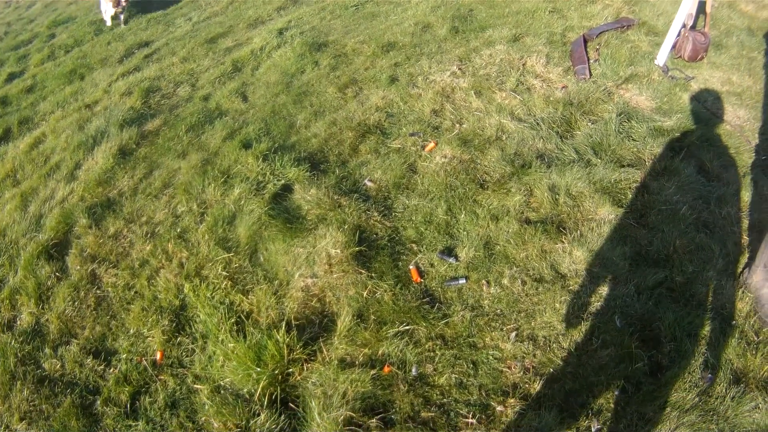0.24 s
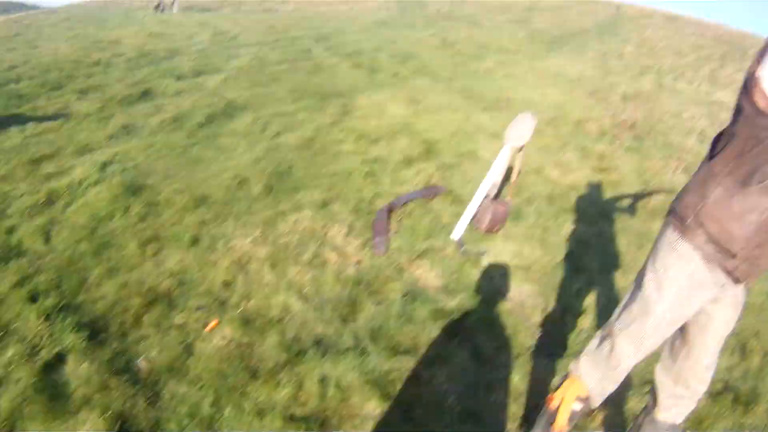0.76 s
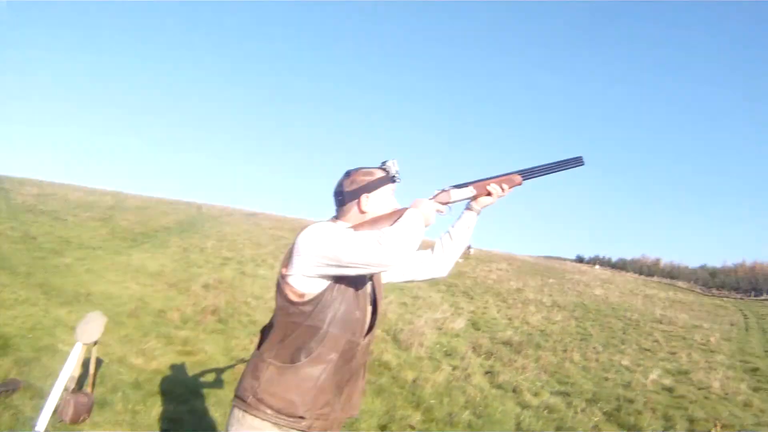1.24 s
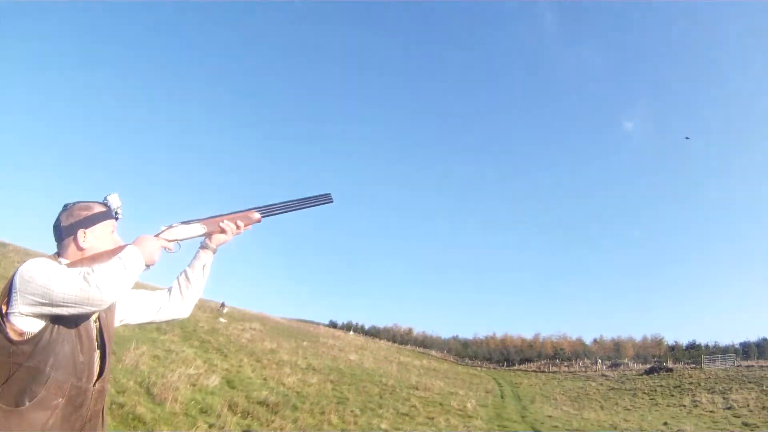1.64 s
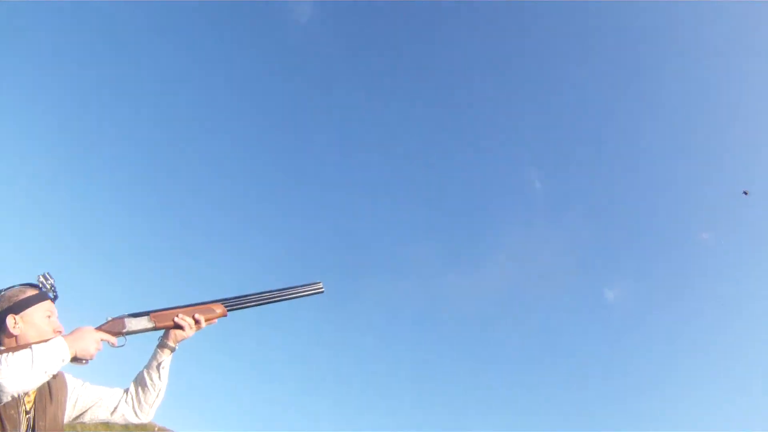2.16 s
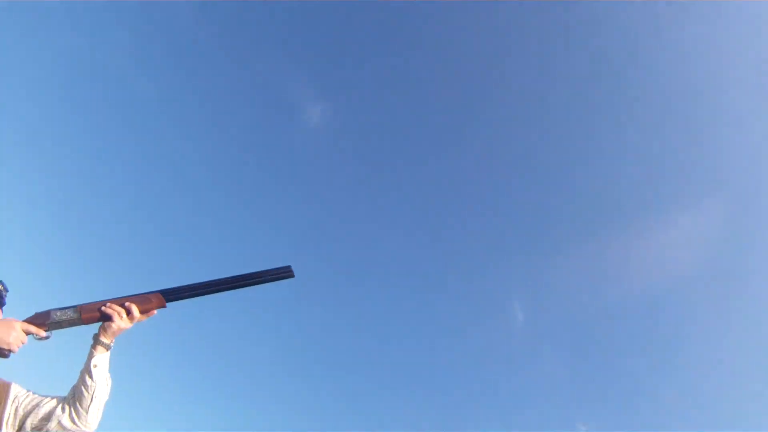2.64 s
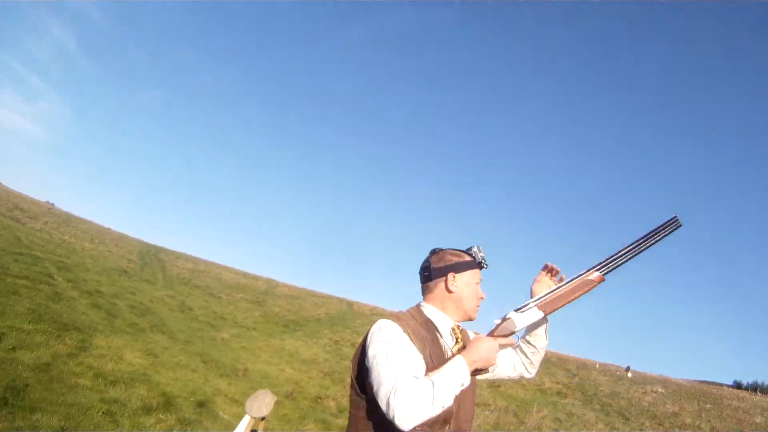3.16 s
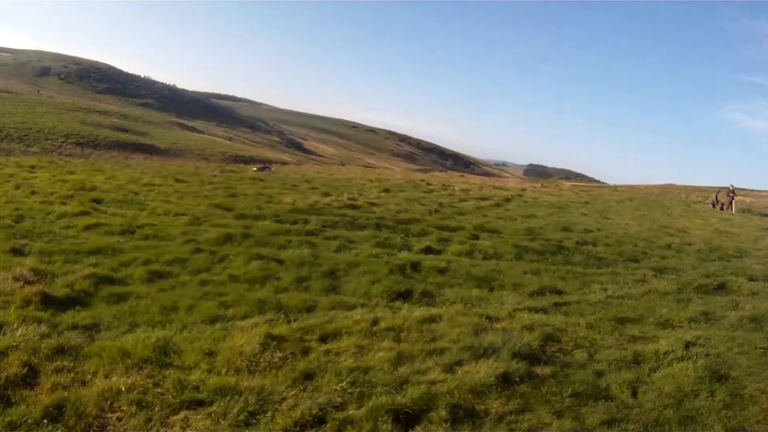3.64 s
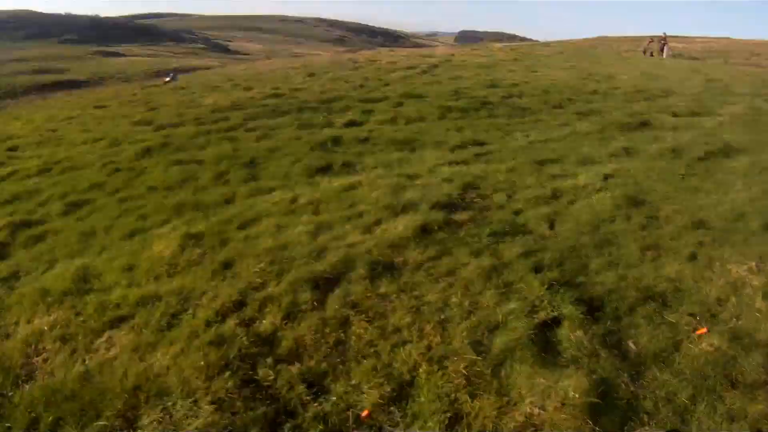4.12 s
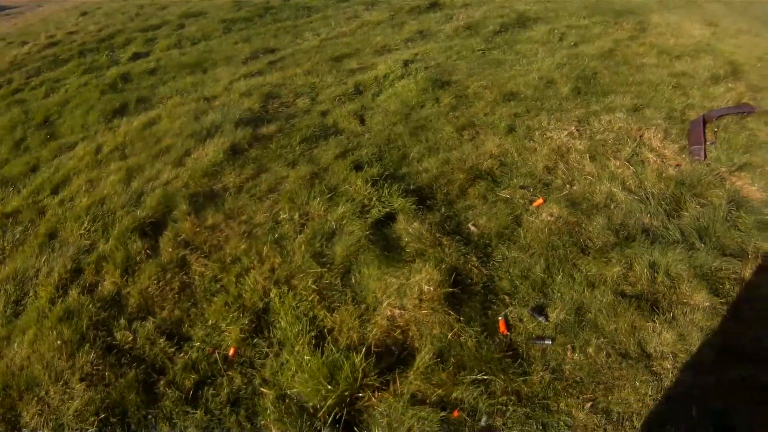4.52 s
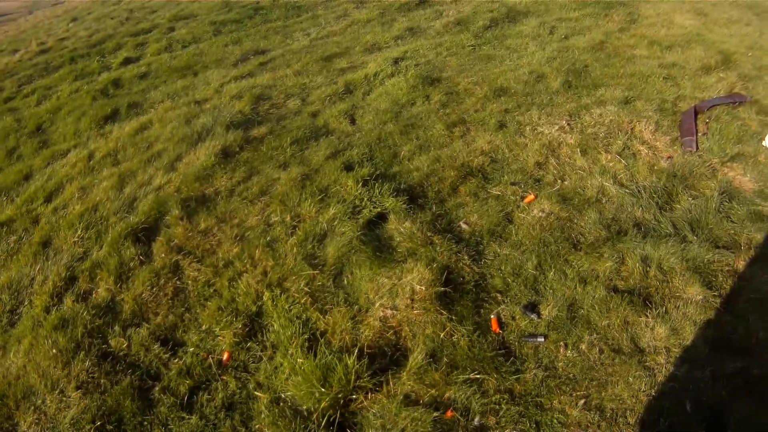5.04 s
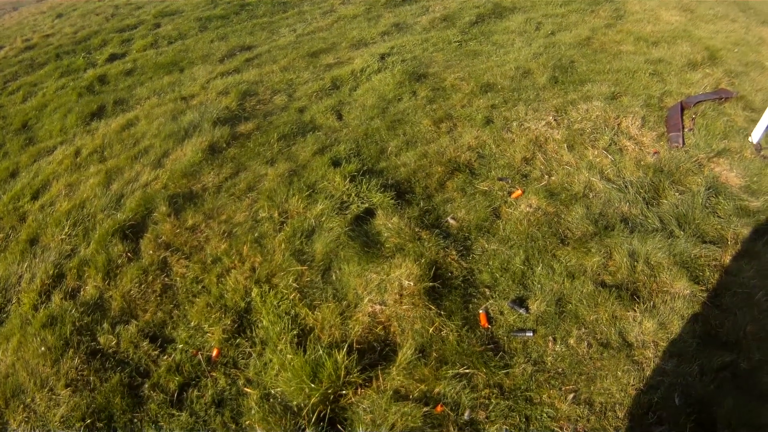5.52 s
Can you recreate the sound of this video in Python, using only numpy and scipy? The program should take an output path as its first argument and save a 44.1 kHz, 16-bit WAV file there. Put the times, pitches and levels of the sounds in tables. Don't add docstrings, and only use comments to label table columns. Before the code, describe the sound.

Low-fidelity outdoor sound, boxy and gritty, with a faint hush and wind buffets. After brief handling noise, shotguns fire four times within about a second, overloading the microphone and ringing its case. Rattling echoes scatter and fade by the third second. Later come a gun part's metallic click, very faint birds, a soft rustle and a final tick.

```python
import sys
import numpy as np
from scipy import signal
from scipy.fft import rfft, irfft
from scipy.io import wavfile
from scipy.ndimage import uniform_filter1d

SR = 44100
rng = np.random.default_rng(int(sys.argv[2]) if len(sys.argv) > 2 else 0)


def voltage_ratio(level):
    return 10 ** (np.asarray(level, float) / 20)


def generate_wav(signal):
    frames = np.transpose(np.atleast_2d(signal))
    scaled = np.clip(frames, -1, 1) * 32767
    pcm = np.round(scaled).astype(np.int16)
    wavfile.write(sys.argv[1], SR, pcm)


N = 254811
T = np.arange(N) / SR
COARSE_T = T[::32]
SIDES = np.array([[1], [-1]])

# t/s, peak/dB, time to gain drop/ms, gain drop/dB, forerunner lead/ms
SHOTS = [
    (0.9734, 4.5, 6.2, -8.5, 0.62),
    (1.7149, 3.5, 5.7, -4.5, 1.41),
    (1.92, 12, 4.7, -13.5, 0.71),
    (1.9452, 14.5, 5.7, -9, 0.36),
]
# f/Hz, density/dB
CASE_COLOUR = [(180, -43), (300, -12.5), (395, -22.5), (603, -10), (855, -16.5), (1170, -7.5), (1550, -6),
               (2050, -6.5), (2560, -12), (2790, -11), (2970, -15.5), (3720, -15), (4160, -26.5),
               (5270, -18), (5900, -41.5), (7670, -67.5), (13000, -120)]


def level(x, rms_db):
    return x * voltage_ratio(rms_db) / np.sqrt(np.mean(x ** 2))


def colour(x, shape):
    hz, db = np.transpose(shape)
    f_hz = np.fft.rfftfreq(len(x), 1 / SR) + 1
    gain_db = np.interp(np.log(f_hz), np.log(hz), db)
    return irfft(rfft(x) * voltage_ratio(gain_db), len(x))


def sos_filter(x, order, edges_hz):
    return signal.sosfilt(signal.butter(order, edges_hz, "bandpass", fs=SR, output="sos"), x)


def walk(rate_hz):
    k = int(SR / rate_hz)
    steps = np.repeat(rng.standard_normal(N // k + 1), k)
    return 1.4 * uniform_filter1d(steps, k)[:N]


def ring(t, hz, db, t60_s, phase=0):
    return (t >= 0) * voltage_ratio(db - 60 * np.abs(t) / t60_s) * np.sin(2 * np.pi * hz * t + phase)


def swell(bursts, rise_db_per_s):
    power = 0
    for start_s, hold_s, db, t60_s in bursts:
        rise_db = rise_db_per_s * np.clip(start_s - COARSE_T, 0, None)
        fall_db = 60 * np.clip(COARSE_T - start_s - hold_s, 0, None) / t60_s
        power = power + voltage_ratio(db - rise_db - fall_db) ** 2
    return np.interp(T, COARSE_T, np.sqrt(power))


def add(out, start_s, x):
    i = int(start_s * SR)
    out[..., i:i + x.shape[-1]] += x[..., :N - i]


def air():
    # f/Hz, density/dB
    hush_colour = [(12, -35), (20, -3), (135, -3), (295, -8), (317, -8.5), (499, -11.5), (2350, -18.5),
                   (2710, -19.5), (3520, -21), (4470, -21.5), (5950, -26.5), (7740, -64), (13100, -120)]
    # f/Hz, density/dB
    hiss_colour = [(12, -35.5), (20, -20), (64, -20), (130, -10), (300, -3), (1940, -3.5), (5410, -3),
                   (5950, -15), (7740, -45.5), (13100, -120)]
    hush = level(colour(rng.standard_normal(N), hush_colour), -62) * voltage_ratio(0.41 * walk(2.0))
    hiss = level(colour(rng.standard_normal(N), hiss_colour), -78)
    return hush + hiss * SIDES


def wind():
    # centre t/s, peak/dB, fall to either side/(dB/s)
    gusts = [(.09, -59, 300), (.29, -58, 200), (.62, -49.5, 90), (.8, -60, 102), (1.0, -54, 53),
             (1.2, -48.5, 124.5), (1.332, -49, 149), (1.54, -55, 204), (1.68, -55, 75), (1.8, -53.5, 300),
             (1.88, -56.5, 299), (2.18, -49, 116), (2.35, -54, 38), (2.63, -58.5, 100),
             (2.78, -45.5, 299.5), (2.86, -54, 118), (3.03, -53.5, 220), (3.15, -54.5, 220),
             (3.3, -51, 180), (3.41, -50.5, 220), (3.55, -53.5, 200), (3.64, -54.5, 150), (3.78, -60, 60),
             (4.09, -50.5, 108.5), (4.29, -68, 100), (4.57, -66, 150), (4.73, -63, 200), (4.97, -70, 80),
             (5.2, -65, 30), (5.68, -74, 80)]
    low = colour(rng.standard_normal(N), [(12, -9.5), (30, 1.0), (50, 0.0), (90, -17.0), (250, -35.5), (1000, -72)])
    low /= np.sqrt(uniform_filter1d(low ** 2, SR // 12) + 1e-12)
    power = sum(voltage_ratio(db - fall * np.abs(COARSE_T - s)) ** 2 for s, db, fall in gusts)
    return low * np.interp(T, COARSE_T, np.sqrt(power))


def streaks():
    # t/s, length/s, f/Hz, level/dB
    bands = [(0.572, .06, 3680, -62), (0.672, 0.057, 3650, -63), (.54, 0.23, 1110, -63),
             (0.582, 0.081, 2050, -53.5), (.59, .2, 1440, -63), (1.02, 0.22, 2370, -60),
             (1.251, 0.16, 2780, -65), (1.09, 0.24, 1150, -64), (1.104, .2, 3650, -75),
             (1.223, .08, 1750, -66), (1.744, 0.062, 2350, -64), (1.815, 0.029, 2440, -51),
             (1.857, 0.014, 2350, -53), (1.959, 0.033, 2380, -46.5), (1.98, .06, 3150, -60.5),
             (1.979, 0.072, 1180, -67), (2.06, 0.087, 2750, -64), (2.083, .05, 2350, -59),
             (2.17, 0.097, 2040, -57), (2.169, 0.17, 1200, -61), (2.182, 0.054, 2800, -59),
             (2.197, .1, 3700, -64), (2.287, .09, 2010, -62), (2.333, 0.065, 2300, -58),
             (2.418, 0.11, 1720, -63.5), (2.42, 0.064, 1220, -63), (2.458, 0.097, 2020, -63),
             (2.569, 0.18, 1800, -72), (2.575, .055, 1313, -61.5), (2.58, .05, 2320, -65),
             (5.65, 0.04, 1313, -67), (5.725, 0.04, 3250, -66), (5.652, .035, 2330, -63),
             (5.685, .02, 2370, -59), (5.68, .025, 1700, -62), (5.74, .04, 2000, -63),
             (5.63, .025, 3400, -67), (2.62, .08, 1700, -69), (2.79, .08, 1900, -69), (2.86, .1, 1680, -69),
             (1.56, .12, 1800, -67), (.505, .02, 2000, -69)]
    width_hz, edge_s = 150, 0.024
    out, t = np.zeros(N), np.arange(SR // 3) / SR
    for s, length_s, hz, db in bands:
        band = rng.standard_normal(len(t))
        for q in (hz / width_hz, hz / width_hz / 2):
            band = signal.lfilter(*signal.iirpeak(hz, q, SR), band)
        gate = np.clip(.5 + np.minimum(t - edge_s / 2, length_s - t) / edge_s, 0, 1)
        add(out, s, level(band, db) * gate)
    return out


def case_wash(treble_db, rumble_db, grain_db):
    # f/Hz, width/Hz, level over broad colour/dB
    case_peaks = [(1130, 40, 8), (1730, 170, 5.5), (2040, 260, 3), (2360, 160, 6), (2780, 85, 0.5),
                  (3110, 310, 1), (3620, 410, 3)]
    grain = voltage_ratio(grain_db * walk(160))
    wash = colour(rng.standard_normal(N), CASE_COLOUR)
    for hz, width_hz, db in case_peaks:
        peak = signal.lfilter(*signal.iirpeak(hz, hz / width_hz, SR), wash)
        wash = wash + voltage_ratio(db + 2.5 * walk(14)) * peak
    wash = level(wash, 0)
    dull = signal.sosfiltfilt(signal.butter(3, 3700, fs=SR, output="sos"), wash)
    rumble_colour = [(60, -20.5), (110, -3.0), (200, -3.5), (450, -12.5), (900, -31.0)]
    rumble = level(colour(rng.standard_normal(N), rumble_colour), 0)
    return grain * (dull + voltage_ratio(treble_db) * (wash - dull)) + voltage_ratio(rumble_db) * rumble


def rustle():
    # t/s, hold/s, level/dB, t60/s
    strokes = [(.61, 0.061, -53.5, 0.86), (.7, 0.035, -52.5, 0.34), (1.52, 0.019, -76.5, 0.43),
               (1.6, 0.064, -64, 0.44), (2.95, .02, -65.5, 0.31), (3.03, 0.13, -69.5, 0.43),
               (3.27, 0.066, -60.5, .6), (3.7, 0.033, -60.5, 0.42), (3.9, .02, -68, .3),
               (4.0, 0.041, -66, 0.55), (5.66, 0.038, -62, 0.26), (5.735, .04, -66.5, .5)]
    return swell(strokes, 250) * case_wash(treble_db=0.5, rumble_db=-12, grain_db=1.5)


def strike_case(hits):
    # f/Hz, level/dB, t60/s
    slap_modes = [(900, -11.5, .01), (1143, -6.5, .014), (1360, -2, 0.014), (1680, -3.5, .012),
                  (2040, -4, .012), (2380, -3, .018), (2780, -11.5, 0.013), (3200, -10, .012),
                  (3650, -8.5, 0.013)]
    slap_db, slap_scatter_db, puff_db, t60_s = -3.5, 3, -9.5, .016
    out, t = np.zeros(N), np.arange(SR // 12) / SR
    slap = np.array([ring(t, hz, db + slap_db, mode_t60_s, 2.0 * k)
                     for k, (hz, db, mode_t60_s) in enumerate(slap_modes)])
    soft = 1 - np.exp(-t / 0.00038)
    for s, db, hz, bright_db in hits:
        noise = rng.standard_normal(len(t))
        puff = level(colour(noise, CASE_COLOUR), db + puff_db)
        puff += level(sos_filter(noise, 3, (3000, 4150)), db + bright_db - 5.5)
        puff += level(sos_filter(noise, 2, (4400, 5600)), db + bright_db - 12)
        modes = voltage_ratio(db - 5 + slap_scatter_db * noise[:len(slap)]) @ slap
        tone = ring(t, hz, db - 1.5, t60_s)
        add(out, s, soft * (tone + modes + puff * voltage_ratio(-60 * t / (1.3 * t60_s))))
    return out


def knocks():
    # t/s, peak/dB, ring f/Hz, bright part/dB
    hits = [(0.665, -37, 2040, -30), (0.7359, -32.5, 1750, 0.5), (0.7695, -37.5, 2300, -24),
            (1.527, -45.5, 2330, -18), (3.894, -49, 2100, -14), (3.9882, -44.5, 1043, -25),
            (4.024, -50, 2800, -8), (5.6466, -48, 1360, -12), (5.6624, -47, 1750, -15),
            (5.7329, -43, 1750, -6)]
    return strike_case(hits)


def clicks():
    # t/s, peak/dB, ring f/Hz, dull part/dB
    ticks = [(0.740, -46, 4800, -10), (0.7465, -49, 4900, -4), (0.752, -50.5, 4800, -4),
             (0.762, -59, 4500, 0), (1.5085, -63, 4750, 6), (2.732, -50, 4850, -3),
             (3.9879, -34, 4777, -4.5), (3.9955, -42.5, 4700, -2), (4.0002, -48, 4750, 0),
             (4.0055, -56, 4650, 6), (4.0112, -58, 4700, -8), (4.0154, -59, 4700, -1),
             (4.0231, -54, 5230, -1), (4.029, -62, 4700, 1), (5.670, -57, 5300, 4)]
    out, t = np.zeros(N), np.arange(SR // 12) / SR
    soft = 1 - np.exp(-t / 0.00021)
    for s, db, hz, dull_db in ticks:
        noise = rng.standard_normal(len(t))
        grit = level(sos_filter(noise, 3, (3800, 5250)), db + 0.5)
        grit += level(sos_filter(noise, 2, (1500, 2500)), db + dull_db)
        add(out, s, soft * (ring(t, hz, db + 2.5, 0.011) + grit * voltage_ratio(-60 * t / 0.016)))
    return out


def shots():
    # f/Hz, level/dB, t60/s
    rings = [
        [(1460, -18, 0.011), (1670, -2, 0.016), (2050, -16, .02), (2341, -1.5, .025), (2780, -11, 0.035),
         (2990, -19, .03), (3150, -8, 0.04), (3600, -8, 0.017), (4050, -20, .012), (4330, -12, 0.0097),
         (5180, -13, 0.016)],
        [(1190, -13, 0.024), (1630, -9, 0.03), (2030, -5, 0.016), (2300, 1, .024), (2660, -18, .016),
         (2900, -11, 0.016), (3500, -24, 0.016), (3900, -18, 0.012), (4300, -11, 0.009), (4760, -12, 0.011),
         (5200, -10, 0.008)],
        [(1165, 0, 0.024), (1380, -7, .016), (1740, -10.5, 0.018), (2020, -1, 0.03), (2350, 1, 0.026),
         (2690, -9, 0.021), (3130, -2, 0.024), (3420, -9, .016), (3640, -6, 0.016), (4350, -30, 0.016),
         (5170, -24, 0.014), (5520, -10, .016)],
        [(1120, 9, .035), (1360, -2, 0.03), (1860, -4, 0.022), (2050, 2, 0.018), (2415, -3.5, 0.025),
         (2720, 1, 0.013), (3100, 1, .018), (3415, -7, .02), (3740, -2.5, 0.018), (4120, -5, 0.022),
         (4540, -13, 0.015), (4850, -14, .012), (5270, -17, .018)],
    ]
    # forerunner/dB, gas jet/dB, low boom/dB, lower band edge of the crack/Hz
    jets = [(-16.5, -29.5, -35, 1270), (-14.5, -41.5, -24, 1200), (-17, -28.5, -38, 1100),
            (-15.5, -30.5, -41, 1520)]
    # thump f/Hz, thump/dB, turf scatter/dB, scatter t60/s, unlike left-right/dB
    after = [(542.7, -18, -46, 0.138, -46), (640, -29, -41, 0.039, -55.5), (420, -25.5, -38, 0.1, -49),
             (660, -23, -37, 0.088, -30)]
    # f/Hz, density/dB
    unlike_colour = [(30, -30), (150, -27), (500, -20), (1000, -20), (1600, -15), (2800, -2), (4500, -12),
                     (5900, -20)]
    early_s = .012
    thump_rise_s, ring_out_db_per_s = .0003, 900
    lurch_db, lurch_s = -44, .004
    out, t = np.zeros((2, N)), np.arange(SR // 4) / SR
    late = t - early_s
    begun, age = late > 0, np.abs(late)
    for shot, jet, tail, modes in zip(SHOTS, jets, after, rings):
        s, db, full_ms, drop_db, lead_ms = shot
        lead_db, jet_db, boom_db, edge_hz = jet
        thump_hz, thump_db, turf_db, turf_t60_s, unlike_db = tail
        noise = rng.standard_normal((3, len(t)))

        case = sum(-ring(t[:SR // 20], hz, mode_db, t60_s, 0.099 * k)
                   for k, (hz, mode_db, t60_s) in enumerate(modes))
        push = voltage_ratio(jet_db - 60 * age / 0.039) * noise[0] * begun
        push[np.argmax(begun)] += 1
        push[int((early_s - lead_ms / 1000) * SR)] += voltage_ratio(lead_db)
        crack = signal.fftconvolve(push, case)[:len(t)]
        passed = signal.ellip(4, 1, 32, (edge_hz, 5550), "bandpass", fs=SR, output="sos")
        crack = signal.sosfilt(passed, crack)

        thump = ring(late, thump_hz, thump_db, 0.018, 0.89) + ring(late, 175, boom_db, 0.016, 0.91)
        thump *= 1 - np.exp(-age / thump_rise_s)
        roar = level(colour(noise[0], CASE_COLOUR), jet_db + 9.5) * voltage_ratio(-60 * age / 0.017) * begun
        crack = crack / np.abs(crack).max() - thump + roar

        after_full_s = late - full_ms / 1000
        full = after_full_s < 0
        dip_db = drop_db * uniform_filter1d(1. - full, SR // 1000)
        crack *= voltage_ratio(dip_db - ring_out_db_per_s * np.clip(after_full_s, 0, None))

        turf = level(colour(noise[1], CASE_COLOUR), turf_db) * voltage_ratio(-60 * age / turf_t60_s) * begun
        unlike = level(colour(noise[2], unlike_colour), unlike_db) * np.exp(-np.abs(late - .003) / 0.0027)
        unlike += voltage_ratio(lurch_db - db) * np.exp(-((late - .006) / lurch_s) ** 2)
        add(out, s - early_s, voltage_ratio(db) * (crack + turf + unlike * SIDES))
    return out


def echoes():
    # t/s, peak/dB, ring f/Hz, bright part/dB
    arrivals = [(0.9903, -24, 3080, -1), (1.0565, -33, 1440, -21), (1.0631, -31.5, 1670, -30),
                (1.072, -31, 1670, -12), (1.0836, -32, 1700, -1.5), (1.0984, -38, 1400, -17),
                (1.1095, -38, 1480, -19), (1.1228, -36.5, 1380, -17), (1.1315, -39, 1150, -18),
                (1.1532, -40, 2360, -8), (1.161, -43, 1310, -24), (1.1685, -31, 1550, -25),
                (1.1745, -35, 1600, -19), (1.2094, -43, 1330, -29), (1.274, -46, 1660, -3.5),
                (1.827, -44, 3380, -6.5), (1.8306, -36, 2380, -13), (1.8597, -42, 2300, -8),
                (1.9594, -21, 2320, -20), (2.0561, -34.5, 1750, -20.5), (2.0656, -36, 1730, -16),
                (2.0845, -28.5, 2050, -10), (2.1205, -40, 2350, -22), (2.167, -30.5, 1800, -6),
                (2.1744, -30, 2060, -12), (2.2045, -36.5, 2050, -8), (2.2109, -35.5, 2050, -3),
                (2.2242, -36, 2040, -19.5), (2.2486, -34, 1260, -21), (2.3684, -35, 1250, -12),
                (2.371, -32, 2380, -28), (2.615, -48, 1770, -25),
                (1.007, -36, 2750, -8), (1.032, -47, 2320, -15), (1.187, -43, 2350, -17),
             (1.195, -47, 1800, -15), (1.229, -46, 1100, -20), (1.247, -46, 990, -20),
             (1.287, -48.5, 1100, -20), (1.750, -49, 2390, -21), (2.102, -41, 2300, -15),
             (2.181, -36.5, 1150, -12), (2.192, -36, 2030, -13), (2.260, -38, 2000, -10),
             (2.309, -44, 1200, -20), (2.324, -46, 1250, -18), (2.3454, -45, 2100, -22),
             (2.357, -44, 2000, -22.5), (2.394, -43, 1800, -18), (2.43, -44, 1680, -20),
             (2.445, -46, 1600, -20), (2.591, -48, 2300, -9)]
    return strike_case(arrivals)


def echo_clouds():
    # t/s, hold/s, level/dB, t60/s
    bursts = [(.99, 0.029, -54.5, 0.66), (1.056, 0.025, -54, 0.4), (1.17, 0.03, -57, 1.94),
              (1.725, .025, -56.5, .3), (1.8, .05, -66, .4), (1.98, 0.04, -54.5, 0.99),
              (2.057, 0.012, -51, .3), (2.085, 0.032, -51, 0.32), (2.168, 0.075, -52, 0.98),
              (2.34, 0.044, -55.5, 0.42), (2.43, 0.059, -58.5, 1.6), (2.58, 0.025, -61, 1.1),
              (1.42, .25, -68, .5), (2.7, .05, -65, 2.2)]
    fired_s = np.array(SHOTS)[:, 0]
    last_shot = np.maximum(np.searchsorted(fired_s, T) - 1, 0)
    age_s = np.abs(T - fired_s[last_shot])
    wash = case_wash(treble_db=21 * np.exp(-age_s / 0.24), rumble_db=-17.5, grain_db=1.5)
    return (T > fired_s[0]) * swell(bursts, 1500) * wash


def slopes():
    # t/s, level/dB, t60/s
    returns = [
        (.99, -58, 0.67),
        (1.725, -56.5, 0.3),
        (1.96, -54, 1.5),
    ]
    # f/Hz, density/dB
    slope_colour = [(300, -20.5), (700, -2.5), (1200, 1), (2500, -4), (4000, -6.5), (5200, -6.5),
                    (5900, -22)]
    wash = level(colour(rng.standard_normal(N), slope_colour), 0) * voltage_ratio(1.5 * walk(150))
    return wash * sum((T > s) * voltage_ratio(db - 60 * np.abs(T - s) / t60_s) for s, db, t60_s in returns)


def birds():
    # t/s, length/s, f/Hz, glide/Hz, level/dB
    peeps = [(4.335, 0.058, 4350, 40, -74), (4.53, .08, 2700, -58, -82), (4.656, .07, 2764, 1, -68),
             (4.71, .05, 2830, -150, -78), (4.93, .09, 4370, 90.5, -77), (5.14, 0.0488, 4400, 60, -81),
             (5.22, .06, 2780, -79, -78), (5.245, .05, 4540, 99, -76)]
    out = 0
    for s, length_s, hz, glide_hz, db in peeps:
        u = (T - s) / length_s
        phase = 2 * np.pi * np.cumsum(hz + glide_hz * np.tanh(u)) / SR
        tone = (1 + 0.2 * walk(60)) * np.sin(phase) + 0.3 * walk(60) * np.cos(phase)
        out = out + voltage_ratio(db) * np.exp(-(2 * u) ** 4) * tone
    return out


def latch():
    # f/Hz, level/dB, t60/s
    latch_modes = [(2380, -11, 0.04), (2310, -8, .024), (2420, -21, .014), (1800, -19, 0.014),
                   (3220, -16, 0.016), (1380, -37.5, 0.017)]
    t = T - 5.7075
    tick = ring(t, 2880, 4, 0.0028)
    seat = sum(ring(t - .0016, *mode) for mode in latch_modes)
    return sos_filter(voltage_ratio(-28) * (tick + seat), 2, (1100, 4200))


def scene():
    handling = streaks() + rustle() + knocks() + clicks() + latch()
    firing = shots() + echoes() + echo_clouds() + slopes()
    return air() + wind() + handling + firing + birds()


def top_cut(x):
    return signal.sosfilt(signal.butter(12, 16390, fs=SR, output="sos"), x)


def record(dry):
    store_hz, ceiling = 12000, .94
    clipped = np.clip(dry, -1.05, 1.05)
    stored = signal.resample_poly(clipped, store_hz, SR, axis=1)
    held = np.repeat(stored, 4, axis=1)
    held = signal.resample_poly(held, SR, 4 * store_hz, axis=1)[:, :N]
    held = np.pad(held, ((0, 0), (0, N - held.shape[1])))
    gentle = signal.ellip(6, .2, 28, 15300, fs=SR, output="sos")
    steep = signal.ellip(8, .2, 60, 16300, fs=SR, output="sos")
    mix = signal.sosfilt(np.vstack([gentle, steep]), np.clip(held, -ceiling, ceiling))
    return top_cut(mix)


dry = scene()
out = record(dry)
generate_wav(out)
```